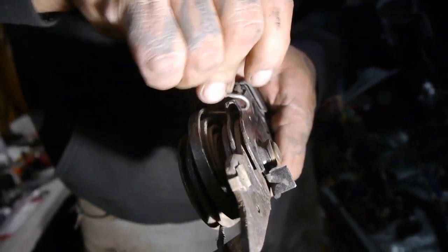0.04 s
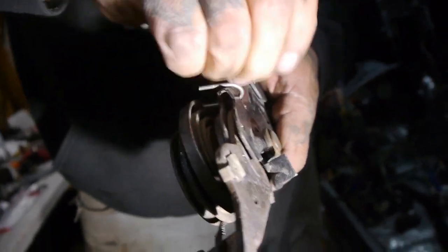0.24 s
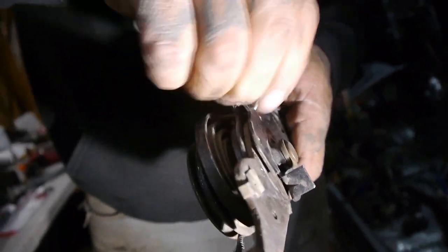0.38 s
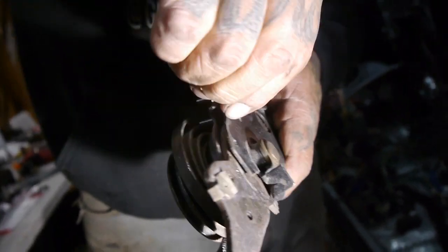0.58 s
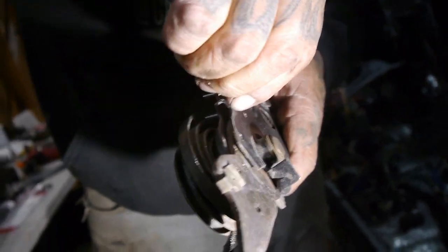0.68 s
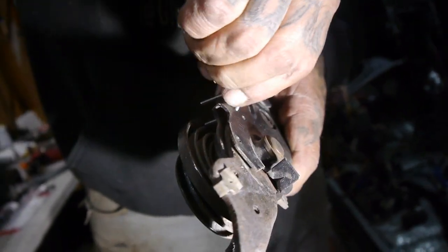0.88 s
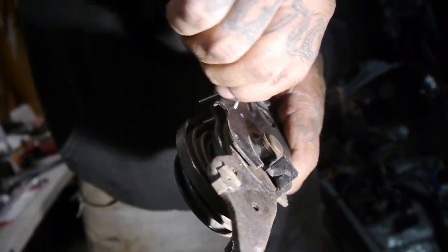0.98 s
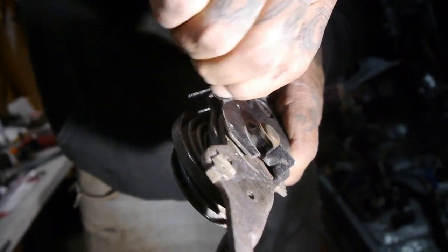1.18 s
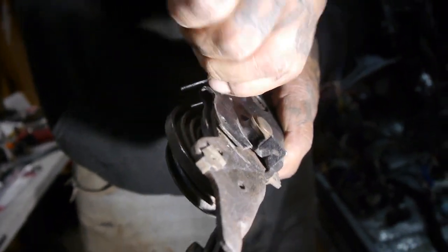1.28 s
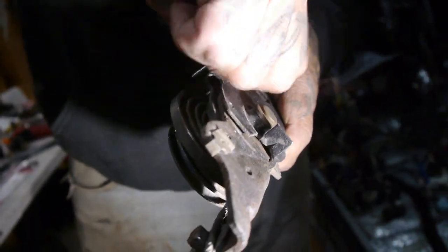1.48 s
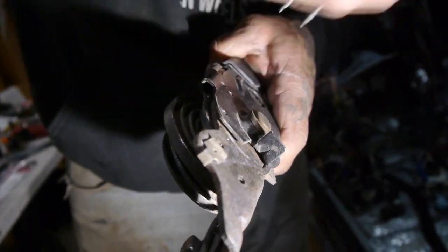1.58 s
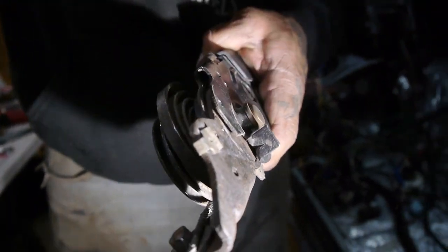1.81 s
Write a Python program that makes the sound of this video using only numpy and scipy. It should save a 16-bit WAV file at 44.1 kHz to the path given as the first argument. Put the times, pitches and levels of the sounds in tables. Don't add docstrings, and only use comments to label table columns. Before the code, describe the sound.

Hands work a pin in a steel brake mechanism, heard very close: rapid clacking first, light rattles and scrapes between, then a few spaced clicks and one last snap, over faint room hiss and hum.

```python
import sys
import numpy as np
from scipy import signal
from scipy.fft import rfft, irfft
from scipy.io import wavfile
from scipy.ndimage import uniform_filter1d

SR = 44100
rng = np.random.default_rng(int(sys.argv[2]) if len(sys.argv) > 2 else 0)


def volts(x):
    e = np.asarray(x, float) / 20
    return 10 ** e


def transcribe(signal):
    frames = np.atleast_2d(signal).T
    limited = np.clip(frames, -1, 1)
    pcm = np.round(limited * 32767).astype(np.int16)
    wavfile.write(sys.argv[1], SR, pcm)


N = 81585


def band(x, lo_hz, hi_hz, order=2):
    return signal.sosfilt(signal.butter(order, [lo_hz, min(hi_hz, .45 * SR)], "band", fs=SR, output="sos"), x)


def unit(x):
    return x / np.sqrt(np.mean(x ** 2))


def add(track, x, s):
    i = max(int(s * SR), 0)
    track[i:i + len(x)] += x[:N - i]


def grit(luck):
    spike_db = 1.6
    return luck[0] * volts(spike_db * luck[1] ** 2)


def ring(low_db, treble_db, upper_db, luck, size=3000):
    # (frequency [Hz], level [dB], t60 [s])
    steel_modes = [(2908, -3.5, .05), (3170, 2, 0.032), (3480, -9.5, 0.061), (4040, -51, 0.06),
                   (4200, -3.5, 0.025), (4566, -6, 0.035), (4656, -12.5, 0.061), (4900, -8.5, .02),
                   (5710, -9, 0.027), (6850, -8, .018), (6800, -12.5, .03), (8000, -9.5, 0.034),
                   (8380, -10.5, 0.01), (10210, -13, 0.025)]
    # (frequency [Hz], level [dB], t60 [s])
    housing_modes = [(1158, -20.5, 0.074), (1588, -14, 0.052), (2359, -14.5, 0.061)]
    # (level [dB], decay [ms])
    crack_decay = [(-11.5, 0.45), (5, 0.23), (19, 0.62), (17.5, 0.49), (13.5, 0.79), (-0.5, 0.15)]
    # (low [Hz], high [Hz])
    crack_edges = [(1000, 2100), (2400, 3650), (3950, 4800), (6300, 9200), (9200, 12500), (12500, 16200)]
    scatter_db, detune, longest_t60_s = 2.2, .011, .048
    buzz_depth, crack_noise_db = .7, -2

    def lift(f):
        regions = [f > 5500, f > 3900, f < 2000]
        return np.select(regions, [treble_db + 17, upper_db + 14.5, low_db + 21.5], 0)

    t = np.arange(size) / SR
    hz, db, t60 = np.array(steel_modes + housing_modes).T[:, :, None]
    n = len(hz)
    gain = volts(db + scatter_db * luck[:n, None] + lift(hz))
    pair = sum(np.sin(2 * np.pi * hz * (1 + detune * luck[k:k + n, None]) * t) for k in (n, 2 * n))
    buzz = unit(uniform_filter1d(luck[:size], size=90))
    shake = 1 + buzz_depth * np.array([np.roll(buzz, 170 * k) for k in range(n)])
    modes = gain * pair * shake * 1000. ** (-t / np.minimum(t60, longest_t60_s))
    steel = modes[:len(steel_modes)].sum(axis=0)
    housing = modes[len(steel_modes):].sum(axis=0)

    noise = volts(crack_noise_db) * luck[60:60 + size] / 3 + (t == 0)
    crack = np.zeros(size)
    for (lo, hi), (level_db, ms) in zip(crack_edges, crack_decay):
        burst = band(noise * np.exp(-t * 1000 / ms), lo, hi, order=4)
        crack += volts(level_db + lift(lo + 1)) * unit(burst) / 30
    return band(steel, 2200, 15000, order=3) + band(housing, 900, 3000) + crack


def thud(hz, size=2000):
    t = np.arange(size) / SR
    cycles = 0.88
    x = band(np.sin(2 * np.pi * hz * t) * np.exp(-t * hz / cycles), 324, 8840)
    return x / np.abs(x).max()


def contact(out, s, db, low_db, treble_db, upper_db, chatter_ms, blow_db):
    chatter_db, knock_db, knock_hz, lead_ms = -4.5, -2, 1263, .9
    luck = rng.standard_normal(9028)
    flurry = grit(luck[5028:].reshape(2, -1))
    push = volts(chatter_db) * flurry * np.exp(-np.arange(len(flurry)) / SR * 1000 / chatter_ms)
    lead = int(lead_ms * SR / 1000)
    push[:lead] *= np.linspace(0, 1, lead)
    push[lead] = volts(blow_db)
    x = signal.fftconvolve(push, ring(low_db, treble_db, upper_db, luck))
    add(out, volts(db) * x / np.abs(x).max(), s)
    add(out, volts(db + low_db + knock_db) * thud(knock_hz), s + lead_ms / 1000)


def strikes():
    # (time [s], peak [dB], low knock [dB], treble [dB], upper mid [dB])
    blows = [(0.054, -23.5, -15.5, -9.5, -19), (0.1349, -17, -25.5, -6.5, -5),
             (0.2197, -11.5, -29, -13.5, -29), (0.3006, -8, -50, -9.5, -15),
             (0.3454, -3, -28.5, -18.5, -7.5), (0.3865, -13.5, -27.5, -10, -20.5),
             (0.4594, -28.5, -11.5, -11, -9), (0.7263, -27.5, -20, -12, -13),
             (0.7613, -33.5, -18, -11, -19), (0.8766, -30, -48, 8, -29), (0.9416, -38, -3.5, -24, -13),
             (0.9737, -35.5, -23.5, -12.5, -15), (1.075, -10.5, -13, -17, -14), (1.1467, -43.5, -12, 5, 7),
             (1.1739, -40.5, -35, 21, -13), (1.2053, -28.5, -21, -9.5, -3.5),
             (1.2359, -16.5, -33, -17.5, -18), (1.3368, -34, 6.5, 1.5, 7.5), (1.392, -43.5, -26, -22, -9),
             (1.4022, -43.5, -6.5, -19, -12), (1.5821, -15, -56.5, -15, -12.5)]
    out = np.zeros(N)
    for s, db, low_db, treble_db, upper_db in blows:
        contact(out, s, db, low_db, treble_db, upper_db, chatter_ms=1.3, blow_db=11)
    return out


def bounces():
    # (time [s], peak [dB], treble [dB], upper mid [dB], chatter decay [ms])
    rebounds = [(.125, -32.5, -49, -23, 1.7), (0.204, -39.5, -23.5, -18, 0.84),
                (0.268, -36.5, -36, -27, 1.85), (0.284, -32.5, -12, -8, 1.7), (0.309, -16.5, 0.5, 2, 2.6),
                (0.33, -27, -30, 1, 1.9), (0.3416, -8, -18.5, -27, 3.07), (0.3501, -22, -24.5, -30, 2.6),
                (0.354, -30, -30, 3, 1.6), (0.36, -36, -28, -12, 3.1), (0.362, -42, -29, -16, 0.84),
                (.383, -20, -10, -15.5, 7.5), (.391, -23.5, -11, -8, 2.2), (0.396, -34.5, -15, -10, 0.73),
                (0.466, -30.5, -11, -16, 2.9), (0.793, -41, -30, -16, 3.9), (0.7966, -44, -15, -22, 2.7),
                (0.812, -42, -31, -26, 2), (0.854, -44.5, -24, -21, 2.5), (0.8792, -17.5, -5.5, -14.5, 4),
                (0.8835, -27, -17, -26, 2.6), (0.886, -24.5, -15, -22, 1.2), (1.066, -42.5, -19, -11, 1.1),
                (1.078, -13.5, -21, -23, 0.45), (1.083, -34, -31, -18, 2.2), (1.084, -27, -14, -2, 1.1),
                (1.089, -24, -12, -14, 2.5), (1.0965, -27.5, -12, -18, 1.4), (1.2238, -28, -18, -12, 1.1),
                (1.234, -29, -27, -22, 2), (1.238, -30, -44, -21, 2), (1.578, -29.5, -7, -7, 11.4),
                (1.587, -28.5, 1, -6, 1), (1.597, -53, -5, -7, 3.1), (0.224, -39.5, -24, 6, 2.9)]
    out = np.zeros(N)
    for s, db, treble_db, upper_db, chatter_ms in rebounds:
        contact(out, s, db, -32.5, treble_db, upper_db, chatter_ms, blow_db=6.5)
    return out


def scrapes():
    # (start [s], length [s], rms level [dB])
    slides = [(.008, 0.042, -50.5), (0.097, 0.04, -52), (0.185, 0.071, -51.5), (0.241, 0.16, -51),
              (0.308, 0.12, -51.5), (0.364, 0.056, -48), (0.708, 0.051, -56.5), (0.736, 0.09, -62.5),
              (1.21, 0.032, -54), (1.402, 0.19, -65), (1.555, 0.052, -50), (1.089, 0.031, -75),
              (1.604, 0.026, -70)]
    held = 170
    out = np.zeros(N)
    for s, length, db in slides:
        n = int(length * SR)
        push = grit(rng.standard_normal((2, 9000)))[:n] * np.hanning(n) ** .6
        body = ring(-14, -24.5, -20.5, rng.standard_normal(5028))[:held]
        x = signal.fftconvolve(push, body * np.linspace(1, 0, held))
        add(out, volts(db) * x / np.sqrt(np.sum(x ** 2) / n), s)
    return out


def rubs():
    # (start [s], length [s], rms level [dB], centre [Hz])
    strokes = [(.648, .045, -60, 930), (.672, .055, -60, 1300), (.005, .05, -62, 1500),
               (.46, .025, -60, 1300), (1.09, .035, -58, 1250), (1.575, .04, -66, 900),
               (.219, .01, -44, 2250), (1.207, .012, -58, 1500), (1.224, .016, -54, 1500)]
    out = np.zeros(N)
    for s, length, db, hz in strokes:
        n = int(length * SR)
        push = grit(rng.standard_normal((2, 9000)))[:n] * np.hanning(n) ** .6
        x = band(push, hz * .78, hz * 1.22)
        add(out, volts(db) * unit(x), s)
    return out


def knocks():
    # (time [s], peak [dB], pitch [Hz])
    taps = [(.073, -42, 440), (.0965, -43.5, 666), (0.152, -42.5, 1090), (0.716, -49.5, 674),
            (0.848, -50, 1180), (.56, -52.5, 466), (0.912, -55, 376), (1.08, -52.5, 181),
            (1.594, -54.5, 272)]
    out = np.zeros(N)
    for s, db, hz in taps:
        add(out, volts(db) * thud(hz), s)
    return out


def ports(x):
    lag_s = 3.3e-5
    turn = np.exp(1j * np.pi * np.fft.rfftfreq(N, 1 / SR) * lag_s)
    return np.array([irfft(rfft(x) * turn, N), irfft(rfft(x) / turn, N)])


def tail(x):
    t = np.arange(SR // 4) / SR
    split_hz, top_hz = 5000, 15000
    paths = [(-13, 1000. ** (-t / .17), 300, split_hz),
             (-19.5, 1000. ** (-t / .11), split_hz, top_hz),
             (-8, np.exp(-t * 1000 / 2.5), 7000, top_hz)]
    kick = np.zeros((2, len(t)))
    for db, fade, lo, hi in paths:
        noise = band(rng.standard_normal((2, len(t))) * fade, lo, hi, order=1)
        kick += volts(db) * noise / np.sqrt(np.sum(fade ** 2))
    return signal.fftconvolve(x[None], kick, axes=1)[:, :N]


def hiss():
    # (frequency [Hz], level per Hz [dB])
    colour_points = [(18, 12), (30, -4), (118, -5.5), (554, -2.5), (889, -5.5), (1670, -6.5), (5310, -12),
                     (8080, -16.5), (16000, -22)]
    # (time [s], level [dB])
    level_curve = [(0, -2), (.5, -3), (1.0, -3), (1.5, -4), (1.68, -5), (1.85, -7)]
    level_db, side_db, wide_hz, dip_hz, dip_db = -59, -4.5, 12000, 85, -8
    f, t = np.fft.rfftfreq(N, 1 / SR) + 1, np.arange(N) / SR
    hz, db = np.array(colour_points).T
    colour = volts(np.interp(np.log(f), np.log(hz), db))
    colour = colour * volts(dip_db * np.exp(-(np.log(f / dip_hz) / .22) ** 2))
    mid, side = rfft(rng.standard_normal((2, N))) * colour
    mid = irfft(mid, N)
    side = irfft(side * volts(side_db) * (1 + f / wide_hz), N)
    wander_db = 1.3 * unit(uniform_filter1d(rng.standard_normal(N), size=2500))
    flicker = volts(wander_db + np.interp(t, *np.array(level_curve).T))
    return (mid + side * np.array([[1], [-1]])) * flicker * volts(level_db) / band(mid, 182, 24000).std()


def hum():
    # (frequency [Hz], rms level [dB])
    tones = [(60, -75), (120, -80), (190, -85)]
    t = np.arange(N) / SR
    sway = .9 * unit(uniform_filter1d(rng.standard_normal(N), size=4000))
    x = sum(volts(db + 1.5) * np.sin(2 * np.pi * hz * t + sway) for hz, db in tones)
    return x * volts(np.array([[-3.0], [3.0]]))


def scene():
    metal = strikes() + bounces() + scrapes() + rubs() + knocks()
    return ports(metal) + tail(metal) + hiss() + hum()


def low_pass(x):
    return signal.sosfilt(signal.butter(12, 16640, fs=SR, output="sos"), x)


def record(dry):
    top_hz = 15700
    mix = signal.sosfilt(signal.ellip(6, .3, 50, top_hz, fs=SR, output="sos"), dry)
    return low_pass(mix)


dry = scene()
out = record(dry)
transcribe(out)
```